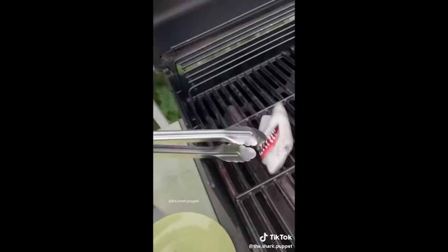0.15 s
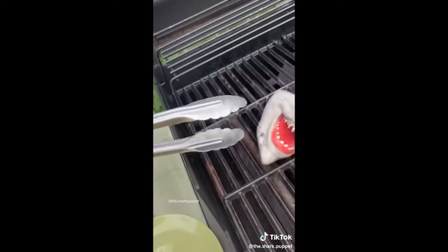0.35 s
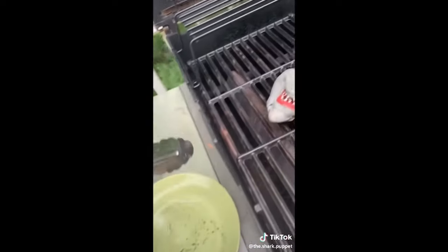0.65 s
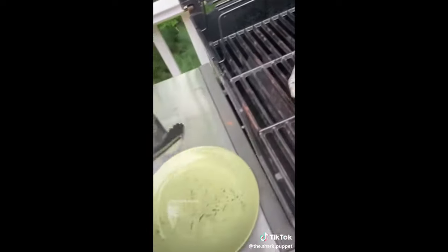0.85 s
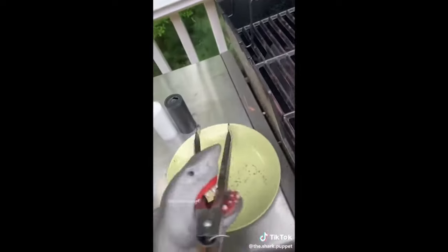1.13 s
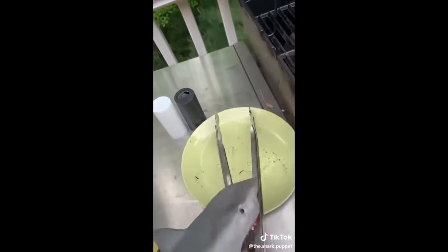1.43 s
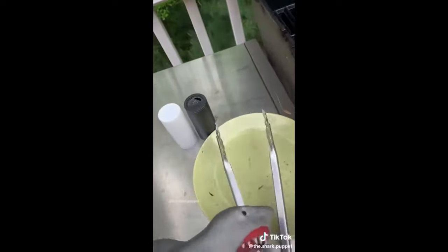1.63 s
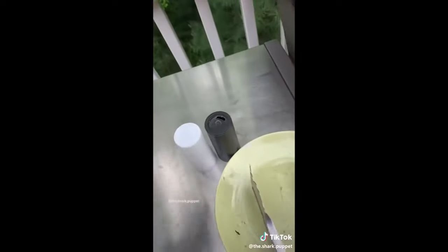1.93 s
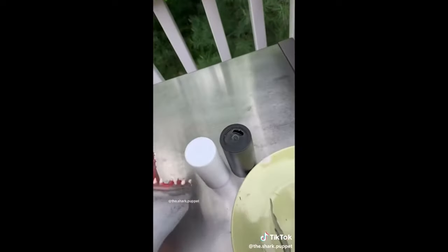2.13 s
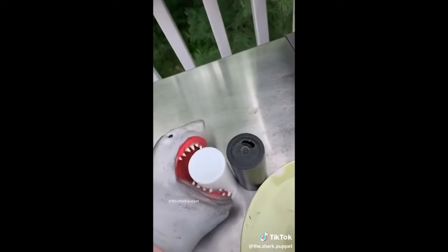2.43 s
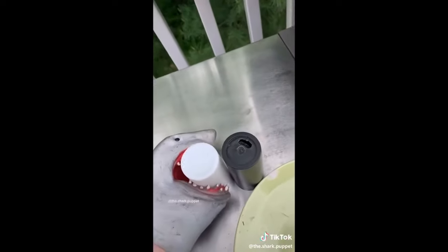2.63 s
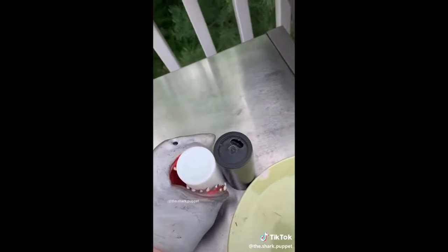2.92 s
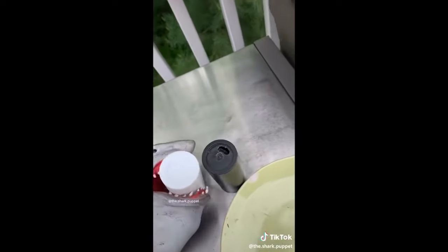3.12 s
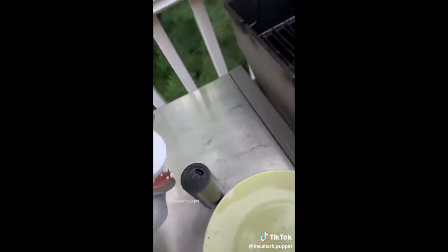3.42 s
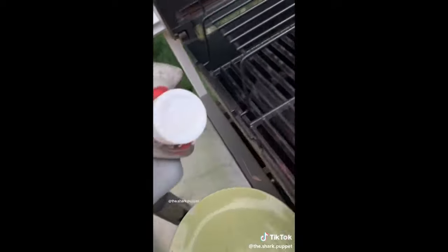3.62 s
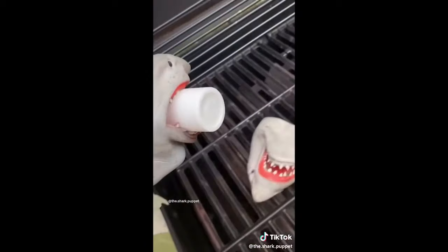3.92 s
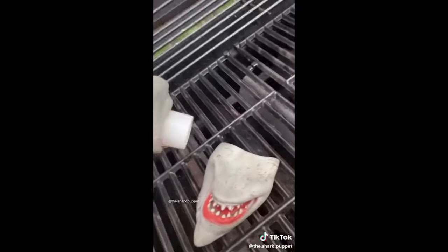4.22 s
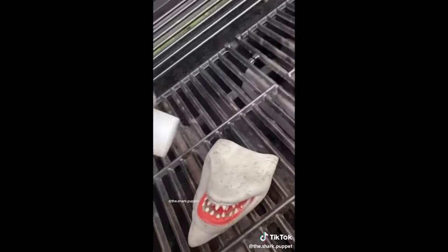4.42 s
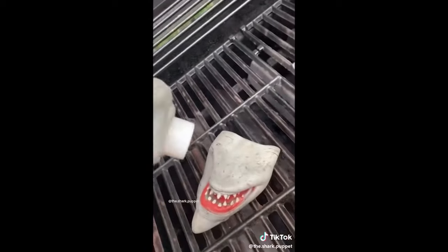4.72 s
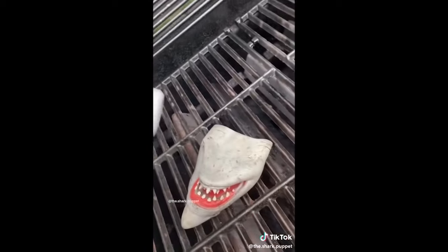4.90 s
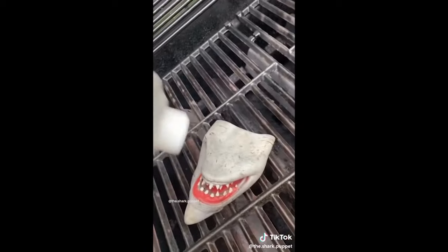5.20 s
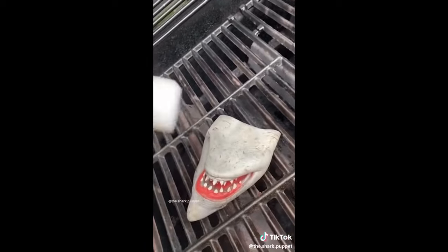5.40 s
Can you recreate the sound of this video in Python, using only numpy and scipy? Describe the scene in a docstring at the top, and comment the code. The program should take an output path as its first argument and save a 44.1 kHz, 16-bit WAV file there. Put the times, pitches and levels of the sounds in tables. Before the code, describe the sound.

Very close to a phone outdoors, steel tongs chirp and tap on grill bars, then clang hard against the firebox. They click, clatter and buzz down with a plate, which drags over a sheet-metal shelf. A light shaker knocks loudly and rapidly there, then lifts with clinks and a sharp salt jolt. Quiet swishes follow, with one dull grate bump ringing low over faint open-air rumble.

```python
"""Outdoors at a gas grill, close to a phone. Steel tongs squeak and tap on the bars, clang on the firebox and
click, then clatter down buzzing with a plate, which is dragged on the sheet-steel shelf. A shaker is knocked
about there, lifted with clinks and thuds, then shaken over the grate, which takes one dull bump and rings on.
Contacts are short noisy forces ringing sets of decaying modes; salt and rubbing are shaped noise grains;
squeaks are wavering sines, thuds are resonated noise bursts, and the open air is steady coloured noise."""
import sys
import numpy as np
from scipy import signal
from scipy.fft import rfft, irfft, next_fast_len
from scipy.io import wavfile
from scipy.ndimage import uniform_filter1d

SR = 44100
rng = np.random.default_rng(int(sys.argv[2]) if len(sys.argv) > 2 else 0)


def master_out(mix):
    """Clip the mix to full scale and print it as 16-bit PCM to the path in sys.argv[1]."""
    frames = np.transpose(np.atleast_2d(mix))
    ceiling = np.clip(frames, -1, 1)
    pcm = np.round(ceiling * 32767).astype(np.int16)
    wavfile.write(sys.argv[1], SR, pcm)


N = 244755
TIME = np.arange(N) / SR

# Levels are relative: later stages weight them. peak_s is the fastest moment of a movement, half_s its half length.
# spot_hz is the pitch favoured by the spot struck; hardness_db is the treble's level over the middle's.

# Steel squeaking on the bars: peak_s, pitch_hz, level_db, half_s
SQUEAKS = [(.211, 800, -44.5, 0.0076), (.233, 790, -52, 0.0094), (.268, 832, -58, 0.012),
           (.312, 1417, -53, 0.012), (.322, 850, -44, 0.011), (.346, 850, -41, 0.011),
           (.369, 914, -40, 0.0052), (.402, 830, -41.5, 0.0057), (.415, 856, -37, 0.0038),
           (.421, 1527, -56, 0.017), (.436, 850, -54, 0.0088)]
# The tongs rubbing on what they hold, then arm against arm: peak_s, level_db, half_s
TONG_RUBS = [(.21, -65, 0.036), (.275, -52, 0.047), (.335, -52, 0.024), (.39, -65.5, 0.096),
             (.86, -51, 0.096), (1.07, -55.5, 0.074)]
# Tong tips tapping the bars: start_s, level_db, hardness_db, chatter_s, spot_hz
BAR_TAPS = [(.2505, -44, -4, .003, 2080), (.315, -42, 5.5, 0.0056, 1800), (.331, -48, 3, 0.0095, 3200),
            (.367, -48.5, -28, 0.0023, 1200), (.411, -48.5, -28, .005, 1550)]
# Tongs against the firebox: start_s, level_db, hardness_db, chatter_s, spot_hz
FIREBOX_CLANGS = [(.636, -22, 0, 0.0072, 700), (.642, -27.5, -1.5, 0.011, 716),
                  (.654, -30, -1.5, 0.0098, 2140), (.667, -37.5, 5.5, 0.0067, 3744),
                  (.699, -41, 3, 0.015, 1800), (.724, -42.5, -19, 0.01, 246.8)]
# Tong tips grinding over the edge of the firebox: peak_s, level_db, half_s
FIREBOX_CRUNCH = [(.652, -24, 0.014), (.668, -36, 0.0055)]
# Arms of the tongs clicking together, steel on steel: start_s, level_db, chatter_s
TONG_CLICKS = [(.806, -52, 0.0023), (.823, -58, 0.0087), (.863, -43.5, 0.0014), (0.877, -54.5, 0.0055),
               (.921, -46.5, 0.0017), (1.0065, -49.5, .008), (1.049, -54, 0.0082), (1.087, -46.5, 0.0023),
               (1.1173, -42, 0.001), (1.142, -43.5, .001), (1.163, -57, 0.0012), (1.179, -57, .0015),
               (1.194, -45.5, 0.0074), (1.2116, -31.5, 0.0038), (1.369, -48, .002), (1.3938, -34.5, 0.0013),
               (1.450, -48.5, 0.0026), (1.4745, -53, 0.0016), (1.679, -50, 0.0066), (1.703, -40, 0.0025)]
# Arms buzzing on each other and the plate: peak_s, level_db, half_s, free_ring_over_buzz_db
TONG_RATTLE = [(0.87, -52.5, 0.038, -12.5), (1.03, -48.5, 0.053, -14), (1.245, -41.5, 0.027, 0.5),
               (1.31, -50, .04, -1), (1.478, -42, 0.15, -16.5), (1.721, -28.5, 0.02, -4.5),
               (1.753, -32.5, 0.021, 10.5), (1.791, -29, 0.019, 5), (1.829, -36, 0.0075, 3),
               (1.97, -61.5, 0.054, 2.5), (2.546, -44, 0.021, 18.5)]
# Tongs dropped on the plate, which rocks heavily on the shelf: start_s, level_db, hardness_db, chatter_s, spot_hz
PLATE_DROPS = [(1.212, -33.5, -6.5, .0076, 2200), (1.228, -31, -18, 0.013, 261),
               (1.287, -37, -3.5, 0.0096, 2790), (1.308, -32, -2.5, 0.0088, 1000),
               (1.322, -34.5, -6, 0.004, 1420), (1.338, -34.5, -10, 0.0059, 1900),
               (1.395, -38.5, -10.5, .009, 2100), (1.688, -38, 3, 0.0074, 2000),
               (1.7018, -26, 7, 0.0082, 3900), (1.720, -31.5, 3.5, 0.015, 2140),
               (1.742, -25.5, -16.5, 0.012, 273.5), (1.766, -28, -7, .0051, 694),
               (1.777, -26, -2.5, 0.039, 2070), (1.815, -31, 1.5, 0.0061, 2100),
               (1.968, -48.5, -10, 0.0063, 430)]
# Things pushed along the shelf: peak_s, level_db, hardness_db, half_s
SHELF_SLIDES = [(1.291, -36, -3.5, .025), (1.315, -31.5, -9.5, .033), (1.44, -61, 14.5, .1),
                (1.644, -51, -1.5, .3), (1.942, -48, -12.5, .068), (2.489, -37.5, 0.5, .05),
                (2.545, -35, -12.5, .028), (2.635, -41.5, -2.5, .035)]
# The rim of the plate singing as it is dragged: peak_s, level_db, half_s
RIM_DRAGS = [(1.90, -51, 0.044), (1.97, -43, .025), (2.03, -46, 0.057)]
# The light shaker knocked about on the shelf: start_s, level_db, hardness_db, chatter_s, spot_hz
SHAKER_KNOCKS = [(2.2585, -20.5, 0, .005, 743), (2.268, -23, 0, .004, 1750), (2.279, -25.5, -3, .007, 2300),
                 (2.296, -36.5, -3, .009, 1100), (2.312, -32.5, 0, .006, 2050),
                 (2.328, -18.5, -3.5, .0035, 1760), (2.336, -28, -2.5, .005, 2080),
                 (2.350, -24.5, -5.5, .007, 1870), (2.378, -33.5, -3.5, .008, 407),
                 (2.4086, -29, -2.5, .002, 4240), (2.418, -22.5, -2, .0084, 790),
                 (2.430, -37.5, -4, .005, 1690), (2.4815, -40, -0.5, .006, 2780),
                 (2.526, -29.5, 1.5, .007, 2000), (2.545, -34.5, 1.5, .01, 2370),
                 (2.564, -28, -11.5, .005, 1768), (2.583, -24.5, -1.5, .0028, 1800),
                 (2.591, -26.5, -4.5, .0069, 860), (2.609, -32.5, 0.5, .008, 1830),
                 (2.626, -36, -5.5, .01, 1750), (2.671, -25, -4.5, .003, 1154),
                 (2.677, -24.5, -10.5, .006, 810), (2.688, -29.5, -5.5, .006, 524)]
# Salt thrown against the lid by each jolt: peak_s, level_db, half_s
SALT_JOLTS = [(2.59, -36.5, 0.095), (2.686, -27.5, 0.013), (3.007, -18.5, 0.00599), (3.05, -29, 0.031),
              (3.16, -47, 0.074), (3.295, -37.5, 0.044), (3.37, -37.5, 0.025), (3.43, -45.5, 0.053)]
# Hollow thuds as the hand closes round the shaker and carries it: start_s, pitch_hz, level_db, length_s
SHAKER_THUDS = [(2.924, 680, -43, 0.0059), (2.964, 490, -48.5, 0.019), (2.968, 254, -43.5, 0.02),
                (3.004, 590, -55, 0.011), (3.139, 515, -54.5, 0.14), (3.172, 322, -58.5, 0.16),
                (3.237, 290, -45.5, 0.055), (3.355, 332, -49, 0.026), (3.901, 572, -58, 0.025)]
# Light, dry ticks, the one near 3.9 s a soft, dull touch of the hand: start_s, level_db, hardness_db, chatter_s
DRY_TICKS = [(2.926, -45, 1, 0.0027), (3.709, -59.5, 10, 0.00037), (3.903, -57, -16, 0.011),
             (5.279, -69, 9, 0.0026)]
# The shaker clinking and scuffing as it is lifted: start_s, level_db, hardness_db, chatter_s, spot_hz
SHAKER_SCUFFS = [(3.003, -37, 17.5, .0014, 6540), (3.007, -38, 18, .0027, 10380),
                 (3.030, -38.5, 13.5, 0.016, 2960), (3.052, -43.5, 13, .0095, 8700),
                 (3.147, -48, 14, .007, 3120), (3.245, -38.5, 11, .0025, 8200), (3.258, -42, 2, .012, 2730),
                 (3.289, -44.5, 13, .012, 5300), (3.359, -39, 12, .003, 3870),
                 (3.369, -41.5, 11, 0.0045, 5900), (3.405, -49, 10, .015, 3240)]
# Swings sending the salt down the shaker's length: peak_s, level_db, half_s
SALT_SWINGS = [(4.0, -71, 0.13), (4.28, -68.5, 0.15), (4.465, -57, 0.058), (4.69, -63.5, 0.085),
               (5.165, -56, 0.056), (5.425, -57, 0.057)]
# A soft bump on the grate, which rocks and settles: start_s, level_db, hardness_db, chatter_s
GRATE_BUMPS = [(4.366, -36, -18, 0.0037), (4.372, -30.5, -21, 0.012), (4.400, -43, -39.5, 0.021),
               (4.428, -45, -44, 0.023)]

# Single modes of each thing: pitch_hz, level_db, t60_s (LOOSE_MODES: tongs lying free on the plate)
BAR_MODES = [(865, 9, 0.055), (1290, 1, 0.045), (1880, 3.5, .05)]
TONG_MODES = [(2810, 2.5, 0.14), (4690, -7, 0.21), (6380, -6.5, .06), (7950, -6.5, .1),
              (10600, -9.5, 0.098), (10500, -4.5, 0.17), (11100, -1.5, 0.097), (11750, -7, .06)]
LOOSE_MODES = [(1692, 9.5, .1), (1713, 6.5, 0.14), (1992, -6, .12), (2210, -8.5, .13), (2770, -7, 0.15),
               (4000, -3, 0.13), (6830, -3, 0.077)]
FIREBOX_MODES = [(104.3, -10, 0.96), (190.5, -4, 1.4), (224, -2.5, 0.73), (264, -11.5, 0.4),
                 (371, -14.5, 0.85), (398.6, -15.5, .6), (567, -12, 0.4), (663, 4.5, .11), (691, 5, .11),
                 (722, -9.5, .22), (920, 3.5, 0.11), (968, 1.5, 0.42), (1010, -3, 0.23),
                 (1400, -17.5, 0.25), (1759, -15.5, 0.72), (2140, 3.5, 0.12), (2358, -7.5, 0.27),
                 (3460, -16.5, 0.033), (8350, 4, 0.06)]
GRATE_MODES = [(81.8, -3, 4), (128, -16, 20), (188.6, 10, .6), (188, -10, 5), (262.4, 18.5, 0.69),
               (355, 10.5, 0.41), (533, -7, 3.9), (559, -9, 4.3), (564, -6, 4.3), (572, 0.5, 4),
               (590, 11, 1.9), (599, -4.5, 4.4), (610, 18, 0.28), (684, 2, 0.62), (850, -10, 1.36),
               (990, -10.5, .4), (1036, 1.5, 0.49), (1105, -4, 2), (1160, -11, 1.2), (1184, -15, 2.2),
               (1249, -4, 0.51), (1350, -18, 2.1), (1520, -15, 1.1), (1527, 15, 0.055), (1753, 14, 0.06)]
SHELF_MODES = [(114.4, -17, 0.27), (250, -0.5, 0.19), (283, 1, 0.26), (345.6, -13, .18), (376, -4, 0.17),
               (431.2, -6.5, .2), (790, -8.5, .046), (1150, -11, 0.13)]
PLATE_MODES = [(1125, -9, 0.048), (1400, -8.5, 0.11), (2047, 4.5, 0.05), (2170, -11, 0.075)]
SHAKER_MODES = [(3023, 11, 0.17), (3162, 5.7, .16), (3710, 7, .09), (5890, 10, 0.077), (6300, 13, .08),
                (8550, 20, 0.088), (9790, 9, .07), (10300, 12, .07), (11200, 10, .1)]
# The crowd of weaker modes between them: frequency_hz, density_db_per_hz, t60_s
DRY_BODY = [(100, 8.5, 0.058), (486.4, -14, 0.02), (885, -15.5, 0.0092), (2080, -26, 0.031),
            (4130, -16.5, 0.013), (8810, -11.5, 0.0208), (12960, -14, 0.057)]
TONG_BODY = [(100, 4, 0.33), (300, 0.5, 0.62), (930, -19.5, 0.22), (1810, 0, 0.13), (3017, -6.5, 0.25),
             (4160, 4.5, 0.096), (4940, 3, .14), (5715, 3, 0.12), (10830, 7, 0.16), (12300, -4, .1)]
FIREBOX_BODY = [(50, -11, 1), (131, -7, 0.98), (267, 7, 0.85), (389, -21.5, 0.72), (726, -3, 0.86),
                (1230, -1.5, 0.53), (2160, -6.5, 0.3), (3020, -11, 0.095), (5700, -15.5, 0.27),
                (9200, -21, 0.17), (13570, -20.5, .15)]
GRATE_BODY = [(45, -17, 1.2), (134.8, 0.5, 7.7), (262, 3.5, 1.17), (400, -9.5, 3.1), (674, -3.5, 0.71),
              (1214, -10, 1.6), (1976, -28, 0.82), (2600, -21.5, 0.53), (3170, -32, 1.1), (5000, -36, 0.62),
              (13060, -40, 0.12)]
SHELF_BODY = [(39.72, -13.5, 0.62), (74.5, -8.5, 0.97), (120, -1, 0.62), (190, -1, 0.77), (277, -3, 1),
              (586, -10, 0.62), (750, -2, 1), (1010, -6.5, 0.27), (1390, -6.5, 0.48), (2030, -8, 0.32),
              (2510, -10.5, 0.19), (4400, -8.5, 0.29), (5200, -16.5, .24), (5870, -8.5, 0.16),
              (10900, -15, 0.051), (12500, -19.5, 0.18)]
SHAKER_BODY = [(101, -1, 0.46), (400, -17.5, .17), (890, -9.5, .16), (2240, -4.5, 0.52), (2780, 0.5, .25),
               (3180, 6, .3), (4260, 6.5, 0.32), (4720, 2.5, .16), (5500, -5, .16), (6040, 8, .19),
               (6750, 0, 0.23), (8400, 1.5, .25), (9300, 2, .2), (10300, 3, 0.3), (13300, 0, .2),
               (15000, -2.5, .12)]

# Colours of the rubbing, grinding and salt noises: frequency_hz, level_db
RUB_COLOUR = [(400, 0), (850, 4), (1200, -0.5), (2000, 2.5), (4200, -1), (5400, -9), (6500, -6),
              (9000, -3.5), (12000, -9.5), (13500, -4)]
CRUNCH_COLOUR = [(2500, -10.5), (3100, -19), (3500, -7), (4500, -9), (5400, -1), (6000, -13.5), (7500, -33),
                 (8400, -14), (9500, -26), (13000, -27)]
JOLT_COLOUR = [(2000, -29), (3800, -5.5), (4800, -6), (6100, 1.5), (6800, -12.5), (8400, -2.5), (9200, -8),
               (11000, -0.5), (12300, -1.5), (13200, -7)]
SALT_COLOUR = [(1500, -17), (2800, -4), (4000, 4), (5000, -4), (6500, 5.5), (9000, 5.5), (11500, 6.5),
               (13000, 3.5)]
# Colour of the outdoor background: frequency_hz, density_db_per_hz
AIR_COLOUR = [(20, -9.5), (45, 4), (100, 0.5), (200, -3.5), (400, -15.5), (900, -21), (1700, -26),
              (2800, -36.5), (4000, -29.5), (6000, -37), (12000, -43.5), (15000, -52)]
# How differently the two microphone ports hear: frequency_hz, side_over_mid_db
STEREO_WIDTH = [(60, -27.5), (200, -21), (380, -10.5), (620, -6), (1000, -7), (1700, -19), (2600, 3.5),
                (4000, 1), (4600, 3.5), (5100, 8), (5800, -2), (7000, -5.5), (9000, -16.5), (12000, -2.5)]

BASS_HZ, TREBLE_HZ, TOP_HZ = 500, 2600, 13100  # register edges and the upper limit of the sound
BASS_LOSS = 0.61  # dB of bass lost for each dB of hardness
CLICK_HARDNESS_DB = 15.5
SPOT_DB, SPOT_WIDTH = 10.5, 0.049  # lift of the favoured resonances; its half width over its pitch
STROKE_SHAPE = 1.6  # how a stroke swells and fades: one is a sharp peak, two a round bell
JUDDER_S = 0.008  # spacing of the grip changes of a sliding thing
SQUEAK_RISE_HZ_PER_S, SQUEAK_WOBBLE = 1800, 0.038  # wobble is rms, over the pitch
THUD_WIDTH = 0.21  # half width of each thud resonator over its pitch
PORT_LAG_S, LEAN = 0.0001, 0.67  # lag setting the phase lead between ports; share of the width it gives


def tongs():
    """The tongs squeak and tap on the bars; their thin steel arms click, buzz, and ring out once let go."""
    bars = response(BAR_MODES, DRY_BODY, modes_db=-16.5, crack_db=-26, crack_s=0.0012, side_db=0, size=8000)
    held = response(TONG_MODES, TONG_BODY, modes_db=-17.5, crack_db=13.5, crack_s=0.013, side_db=5, size=14000)
    free = response(LOOSE_MODES + TONG_MODES, TONG_BODY,
                    modes_db=17, crack_db=9, crack_s=0.0037, side_db=-3, size=14000)
    taps = strike(BAR_TAPS, bars, bass_db=-15.5, chatter_db=6, spread_db=4, graze_s=0.001, colour_db=3)
    hard_clicks = [(s, db, CLICK_HARDNESS_DB, chatter_s) for s, db, chatter_s in TONG_CLICKS]
    clicks = strike(hard_clicks, held, bass_db=7.5, chatter_db=3, spread_db=6, graze_s=0.0005, colour_db=4.5)
    buzz_strokes = [(s, db, half_s) for s, db, half_s, _ in TONG_RATTLE]
    ring_strokes = [(s, db + ring_db, half_s) for s, db, half_s, ring_db in TONG_RATTLE]
    buzz = rubbed(buzz_strokes, held, spread_db=5.5)
    ringing = rubbed(ring_strokes, free, spread_db=3)
    rub = hiss(TONG_RUBS, RUB_COLOUR, spread_db=3.5, side_db=-1.5)
    return taps + squeaks() + clicks + buzz + ringing + rub


def squeaks(size=6000):
    """Steel sticks and slips in short chirps that waver and rise a little."""
    out = np.zeros((2, N))
    for s, hz, db, half_s in SQUEAKS:
        span = int(s * SR) - size // 2 + np.arange(size)
        wobble = uniform_filter1d(rng.standard_normal(size), size=100)
        pitch = hz * (1 + SQUEAK_WOBBLE * wobble / wobble.std())
        pitch += SQUEAK_RISE_HZ_PER_S * (TIME[span] - s)
        tone = np.sqrt(2) * np.sin(2 * np.pi * np.cumsum(pitch) / SR)
        out[0, span] += undb(db) * stroke(s, half_s)[span] * tone  # mid only
    return out


def firebox():
    """The struck firebox clangs and hums low; its edge crunches as grains of noise."""
    shell = response(FIREBOX_MODES, FIREBOX_BODY, modes_db=1, crack_db=16, crack_s=0.0032, side_db=2, size=48000)
    clangs = strike(FIREBOX_CLANGS, shell, bass_db=1, chatter_db=5, spread_db=4, graze_s=0.0022, colour_db=3.5)
    return clangs + hiss(FIREBOX_CRUNCH, CRUNCH_COLOUR, spread_db=4.5, side_db=-1)


def grate():
    """A soft bump wakes the bars of the grate, whose close modes ring long and beat against each other."""
    bars = response(GRATE_MODES, GRATE_BODY, modes_db=0, crack_db=18.5, crack_s=0.019, side_db=0.5, size=60000)
    return strike(GRATE_BUMPS, bars, bass_db=-10.5, chatter_db=-5, spread_db=4, graze_s=0.0014, colour_db=1.5)


def shelf():
    """One steel sheet answers drops, slides and knocks; tongs left on it ring along with the knocks."""
    sheet = response(SHELF_MODES, SHELF_BODY, modes_db=-7.5, crack_db=12, crack_s=0.0051, side_db=-4, size=30000)
    laden = response(SHELF_MODES + LOOSE_MODES, SHELF_BODY,
                     modes_db=-2.5, crack_db=10, crack_s=0.014, side_db=2.5, size=30000)
    drops = strike(PLATE_DROPS, sheet, bass_db=-2.5, chatter_db=10, spread_db=4.5, graze_s=0.002, colour_db=4)
    knocks = strike(SHAKER_KNOCKS, laden, bass_db=-7.5,
                    chatter_db=8, spread_db=5.5, graze_s=0.001, colour_db=3.5)
    return drops + knocks + slide(sheet, bass_db=-1, spread_db=4.5, colour_db=5)


def slide(ring, bass_db, spread_db, colour_db, judder_db=1.5, size=4096):
    """Stick and slip: a stream of tiny contacts drives the shelf, changing colour as the contact travels."""
    stream = np.zeros(N)
    for i in range(0, N - size, size // 2):
        piece = unit(place(grains(size, spread_db), colour_db))
        stream[i:i + size] += np.sqrt(np.hanning(size) * size) * piece
    moments = np.arange(0, TIME[-1], JUDDER_S)
    grip = undb(judder_db * np.interp(TIME, moments, rng.standard_normal(len(moments))))
    stream *= grip / np.sqrt(np.mean(grip ** 2))
    pushes = sum(np.outer(touch(db, hardness_db, bass_db), stroke(s, half_s))
                 for s, db, hardness_db, half_s in SHELF_SLIDES)
    out = np.zeros((2, N))
    for part, push in zip(registers(ring), pushes):
        out += signal.fftconvolve(np.sqrt(2) * unit(part), (stream * push)[None], axes=-1)[:, :N]
    return out


def plate():
    """The rim of the plate sings briefly as dragging keeps its modes ringing."""
    rim = response(PLATE_MODES, DRY_BODY, modes_db=23, crack_db=-6, crack_s=0.0022, side_db=-6.5, size=8000)
    return rubbed(RIM_DRAGS, rim, spread_db=7)


def shaker():
    """The shaker clinks, ticks and thuds; its salt hisses with each jolt and swing."""
    shell = response(SHAKER_MODES, SHAKER_BODY,
                     modes_db=-3, crack_db=-3.5, crack_s=0.0075, side_db=1.5, size=18000)
    dull = response(BAR_MODES, DRY_BODY, modes_db=-21.5, crack_db=4, crack_s=0.0017, side_db=4, size=6000)
    scuffs = strike(SHAKER_SCUFFS, shell, bass_db=-3.5,
                    chatter_db=12, spread_db=7, graze_s=0.0012, colour_db=5.5)
    ticks = strike(DRY_TICKS, dull, bass_db=-10, chatter_db=21, spread_db=5.5, graze_s=0.0013, colour_db=5)
    jolts = hiss(SALT_JOLTS, JOLT_COLOUR, spread_db=3, side_db=-7.5)
    swings = hiss(SALT_SWINGS, SALT_COLOUR, spread_db=2, side_db=-25)
    return scuffs + ticks + thuds() + jolts + swings


def thuds(side_db=-4, size=8000):
    """Soft pushes on a hollow body, whose pitch changes with the grip."""
    out, t = np.zeros((2, N)), np.arange(size) / SR
    for s, hz, db, length_s in SHAKER_THUDS:
        push = rng.standard_normal((2, size)) * np.exp(-(t / length_s) ** 2)
        cavity = signal.iirpeak(hz, 1 / (2 * THUD_WIDTH), fs=SR)
        sound = signal.lfilter(*cavity, signal.lfilter(*cavity, push))
        sound = np.array([unit(row) for row in sound])
        start = int(s * SR)
        out[:, start:start + size] += undb(db) * np.sqrt(length_s * SR) * sound
    return out * undb([[0], [side_db]])


def outdoors(level_db=-57):
    """A low, even rumble of open air, as steady coloured noise."""
    return undb(level_db) * coloured(rng.standard_normal((2, N)), AIR_COLOUR)


def response(modes, body, modes_db, crack_db, crack_s, side_db, size):
    """One sharp tap, as mid and side: a short crack, a crowd of weak modes, and the single modes."""
    t = np.arange(size) / SR
    crowd, noise = 0, rng.standard_normal((2, size))
    centres = np.geomspace(40, 16000, 14)
    for hz, share in zip(centres, np.eye(len(centres))):
        band = shape(noise, lambda f: np.interp(f, centres, share))
        crowd = crowd + band * np.exp(-np.log(1000) * t / along(hz, body, axis=2))
    crack = 1 + undb(crack_db) * np.exp(-t / crack_s)
    crowd = np.array([evened(row * crack, body) for row in crowd])
    # the side part of each mode is a quarter cycle off its mid part
    phases = rng.uniform(0, 2 * np.pi, (len(modes), 1, 1)) + np.array([[0], [np.pi / 2]])
    lines = sum(undb(db) * np.exp(-np.log(1000) * t / t60) * np.sin(2 * np.pi * hz * t - phase)
                for (hz, db, t60), phase in zip(modes, phases))
    fade = np.minimum(1, 10 * (1 - t / t[-1]))
    return (unit(crowd) + undb(modes_db) * unit(lines)) * fade * undb([[0], [side_db]])


def strike(blows, ring, bass_db, chatter_db, spread_db, graze_s, colour_db, size=7000, lead_size=1400):
    """Each blow is a graze, an impact and a burst of chatter; the hardness of contact sets its registers."""
    out, t = np.zeros((2, 2 * N)), (np.arange(size) - lead_size) / SR
    parts = np.array(registers(ring))
    for s, db, hardness_db, chatter_s, *spot_hz in blows:
        contact = np.exp(np.where(t < 0, t / graze_s, -(t / chatter_s) ** 2))
        force = undb(chatter_db) * np.sqrt(chatter_s / 0.006) * unit(grains(size, spread_db) * contact)
        force[lead_size] += 1  # the impact
        force = place(force, colour_db, *spot_hz)
        sound = signal.fftconvolve(parts, force[None, None], axes=-1)
        # the loudest short stretch of each register sets its level
        power = np.mean(sound[..., :size] ** 2, axis=1)
        crest = uniform_filter1d(power, size=300).max(axis=1) ** 0.5
        start = int(s * SR) - lead_size
        gains = touch(db, hardness_db, bass_db) / crest
        out[:, start:start + sound.shape[-1]] += np.tensordot(gains, sound, 1)
    return out[:, :N]


def touch(db, hardness_db, bass_db):
    """Bass, middle and treble gains: a hard contact excites more treble and less bass than a soft one."""
    return undb([db + bass_db - BASS_LOSS * hardness_db, db, db + hardness_db])


def place(x, colour_db, spot_hz=None, count=44):
    """Each point of contact favours some resonances and starves others; long bass waves hardly care."""
    points = np.linspace(0, TOP_HZ, count)
    ripple_db = colour_db * rng.standard_normal(count) * np.minimum(1, points / 1500)

    def gain(hz):
        lift_db = SPOT_DB / (1 + ((hz / spot_hz - 1) / SPOT_WIDTH) ** 2) if spot_hz else 0
        return undb(np.interp(hz, points, ripple_db) + lift_db)
    return shape(x, gain)


def rubbed(strokes, ring, spread_db):
    """A run of tiny uneven contacts keeps a thing ringing for as long as each stroke lasts."""
    force = grains(N, spread_db) * sum(undb(db) * stroke(s, half_s) for s, db, half_s in strokes)
    return signal.fftconvolve(np.sqrt(2) * unit(ring), force[None], axes=-1)[:, :N]


def hiss(strokes, spectrum, spread_db, side_db):
    """Fine grains rubbing in front of the phone, as loud as the strokes that drive them."""
    sound = coloured(np.array([grains(N, spread_db) for _ in range(2)]), spectrum)
    sound = sound * undb([[1.5], [side_db]])
    return sound * sum(undb(db) * stroke(s, half_s) for s, db, half_s in strokes)


def stroke(s, half_s):
    """A movement gathers speed, peaks at s and slows down again."""
    speed = np.zeros(N)
    near = slice(*np.searchsorted(TIME, [s - 10 * half_s, s + 10 * half_s]))
    speed[near] = np.exp(-np.abs((TIME[near] - s) / half_s) ** STROKE_SHAPE)
    return speed


def grains(size, spread_db):
    """Dense tiny contacts of very uneven strength, as noise whose level jumps every 16 samples."""
    strength = np.minimum(rng.exponential(size=size // 16 + 1), 5)
    strength = np.repeat(strength, 16)[:size]
    x = rng.standard_normal(size) * undb(spread_db * strength)
    return x / x.std()


def registers(x, order=4):
    """Split into bass, middle and treble."""
    edges = (("low", BASS_HZ), ("band", [BASS_HZ, TREBLE_HZ]), ("high", TREBLE_HZ))
    filters = [signal.butter(order, hz, kind, fs=SR, output="sos") for kind, hz in edges]
    return [signal.sosfilt(sos, x + 1e-18) for sos in filters]


def evened(x, spectrum, width_hz=55):
    """Share the energy of x out along a spectrum, leaving only lumps narrower than width_hz."""
    power = uniform_filter1d(np.abs(rfft(x)) ** 2, size=int(width_hz * len(x) / SR) + 1)
    bins = np.fft.rfftfreq(len(x), 1 / SR)
    return shape(x, lambda hz: undb(along(hz, spectrum)) / np.sqrt(np.interp(hz, bins, np.abs(power)) + 1e-12))


def coloured(x, spectrum):
    """Give x a spectrum and an rms of one."""
    y = shape(x, lambda hz: undb(along(hz, spectrum)))
    return y / y.std()


def shape(x, gain, pad_size=2048):
    """Filter by a gain given as a function of frequency."""
    size = next_fast_len(x.shape[-1] + pad_size, True)
    return irfft(rfft(x, size) * gain(np.fft.rfftfreq(size, 1 / SR)), size)[..., :x.shape[-1]]


def along(hz, table, axis=1):
    """Read one column of a table on a log-frequency axis."""
    rows = np.array(table, float)
    return np.interp(np.log(hz + 1), np.log(rows[:, 0]), rows[:, axis])


def unit(x):
    """Scale to an energy of one."""
    return x / np.sqrt(np.sum(x ** 2) + 1e-20)


def undb(db):
    """Decibels to gain."""
    return 10 ** (np.asarray(db) / 20)


def lean(hz):
    """Phase lead of one port as a share of the width: left leads below 5 kHz, right in the next 5 kHz."""
    return LEAN * np.tanh(np.pi * np.sin(2 * np.pi * hz * PORT_LAG_S))


def scene():
    """All sources as mid and side, shared out to left and right by frequency."""
    mid, side = tongs() + firebox() + grate() + shelf() + plate() + shaker() + outdoors()
    leaning = shape(mid, lambda hz: 1j * lean(hz))
    side = leaning + shape(side, lambda hz: np.sqrt(1 - lean(hz) ** 2))
    angle = lambda hz: np.arctan(undb(along(hz, STEREO_WIDTH)))
    mid = shape(mid, lambda hz: np.cos(angle(hz)))
    side = shape(side, lambda hz: np.sin(angle(hz)))
    return np.array([mid + side, mid - side])


def record(dry):
    """The phone cuts the top with a steep low-pass."""
    return signal.sosfilt(signal.ellip(8, 0.3, 70, TOP_HZ, fs=SR, output="sos"), dry)


dry = scene()
out = record(dry)
master_out(out)
```